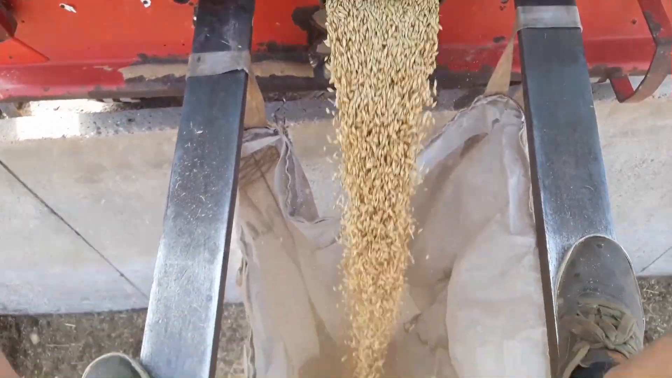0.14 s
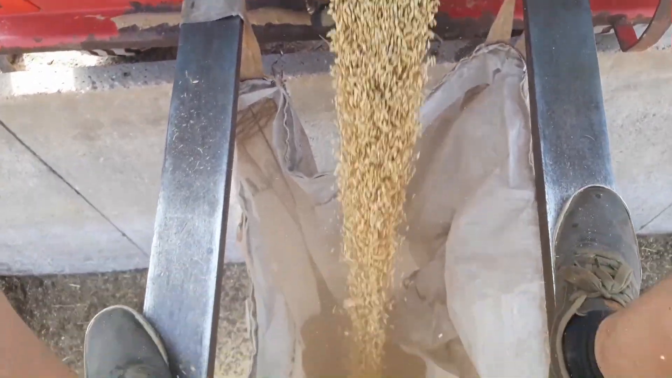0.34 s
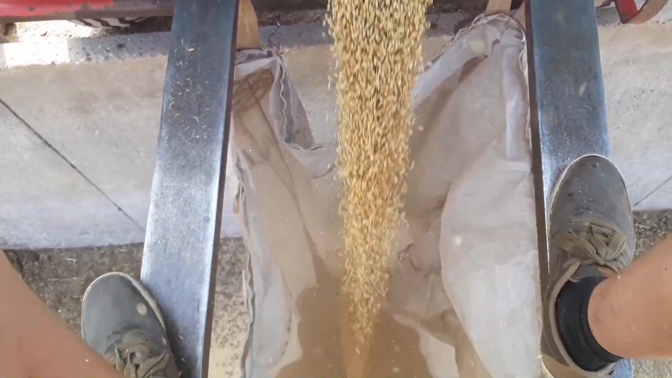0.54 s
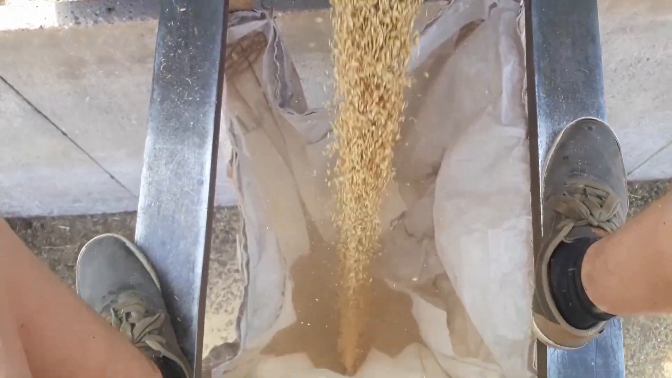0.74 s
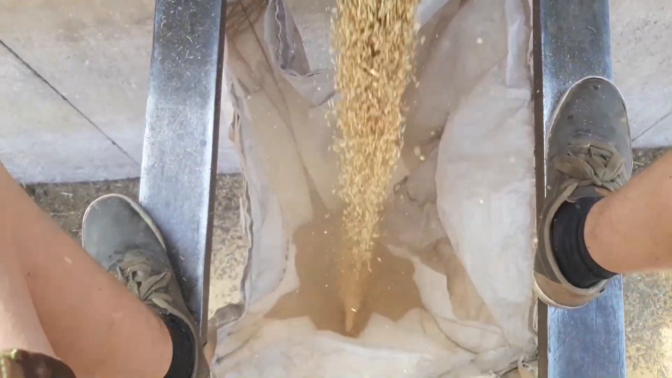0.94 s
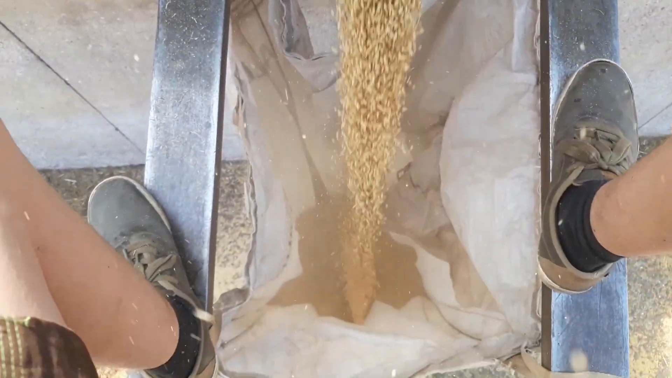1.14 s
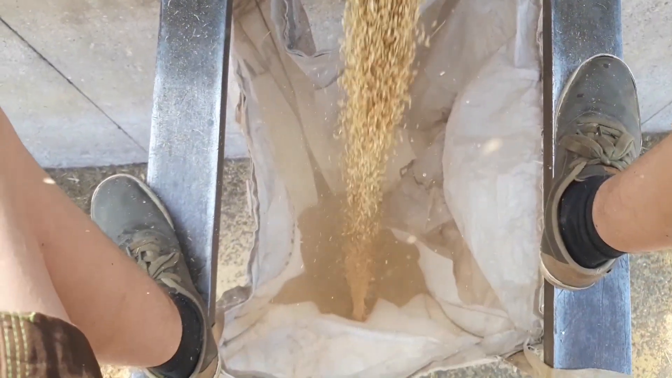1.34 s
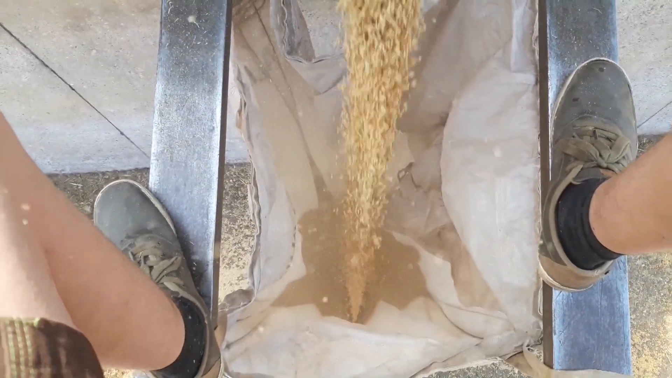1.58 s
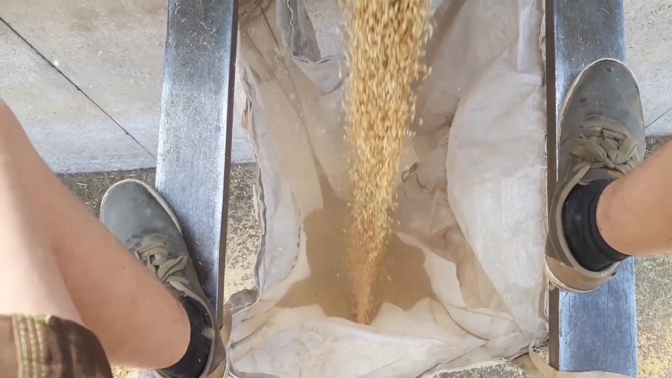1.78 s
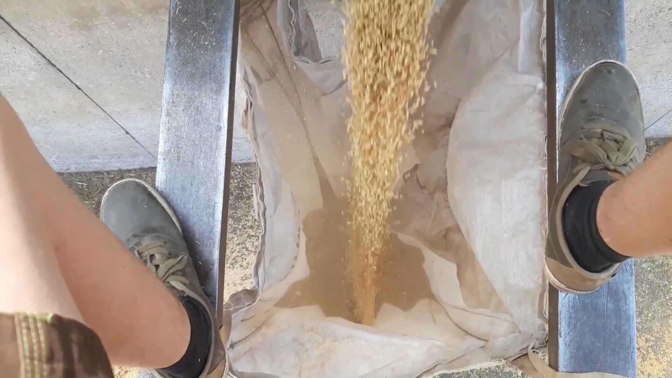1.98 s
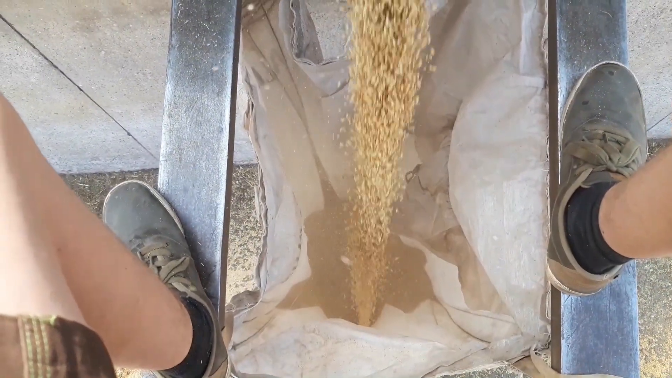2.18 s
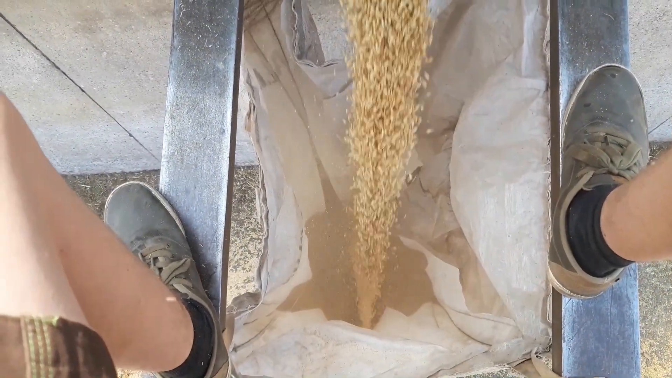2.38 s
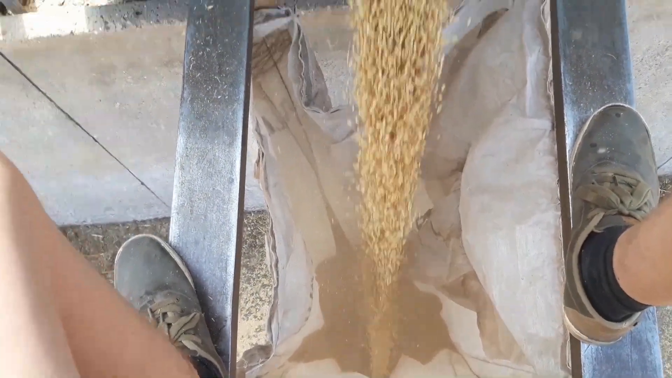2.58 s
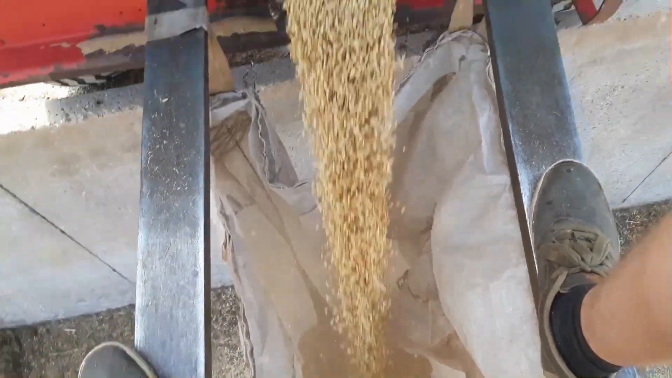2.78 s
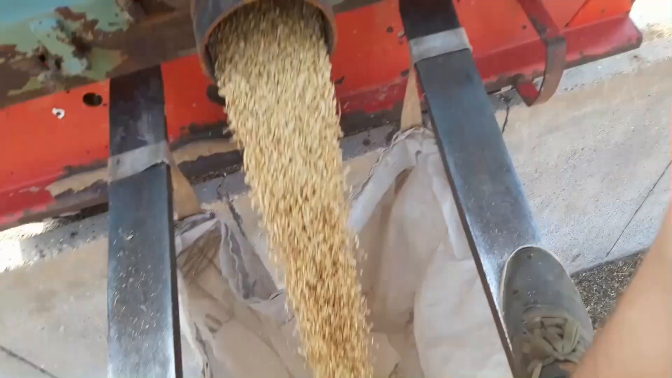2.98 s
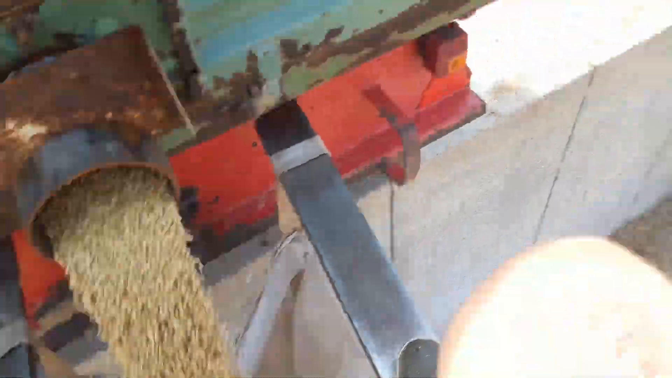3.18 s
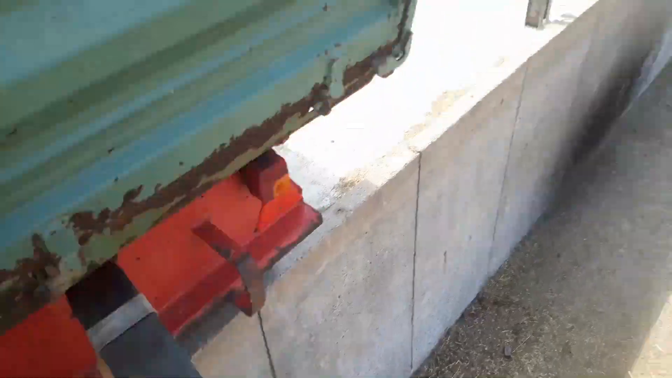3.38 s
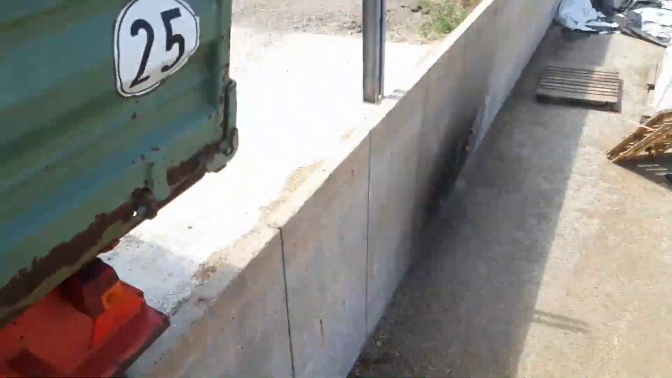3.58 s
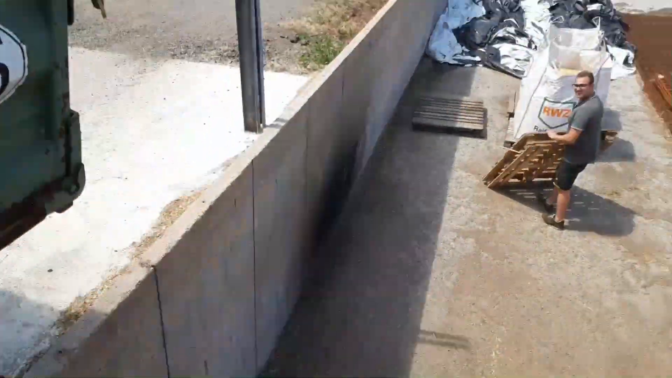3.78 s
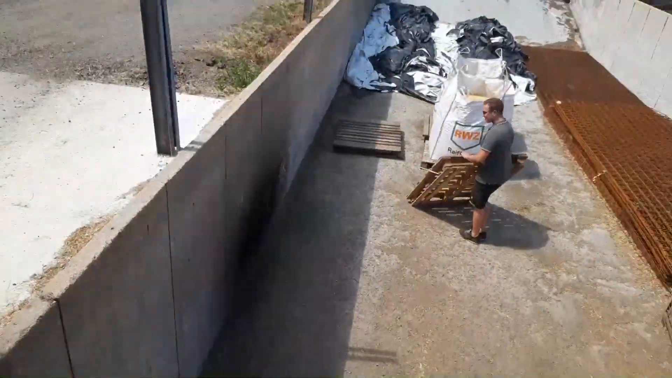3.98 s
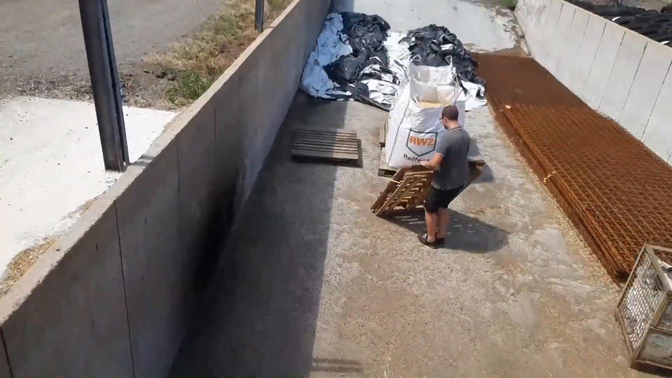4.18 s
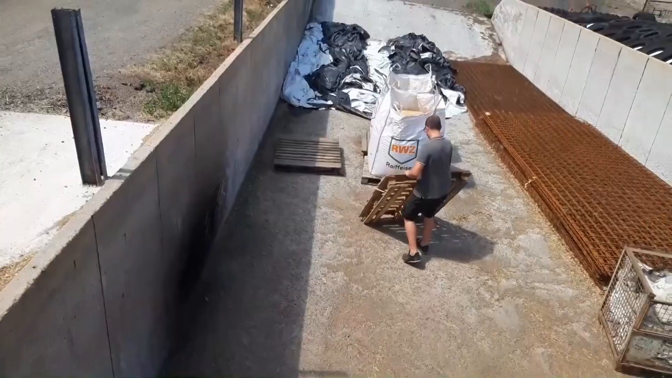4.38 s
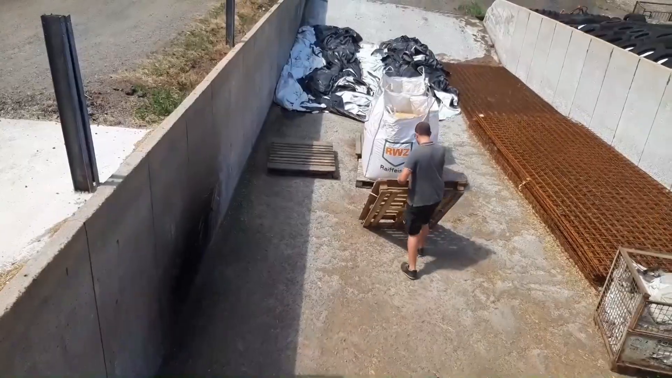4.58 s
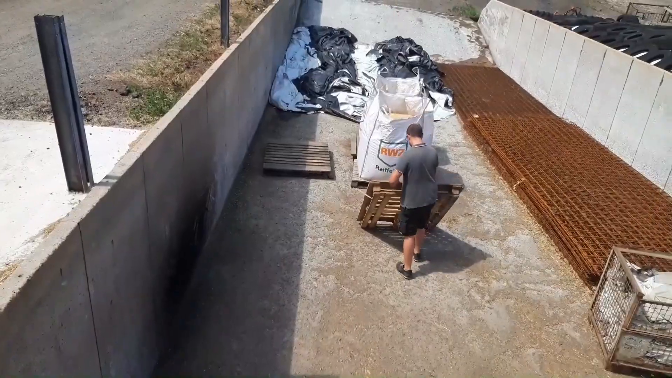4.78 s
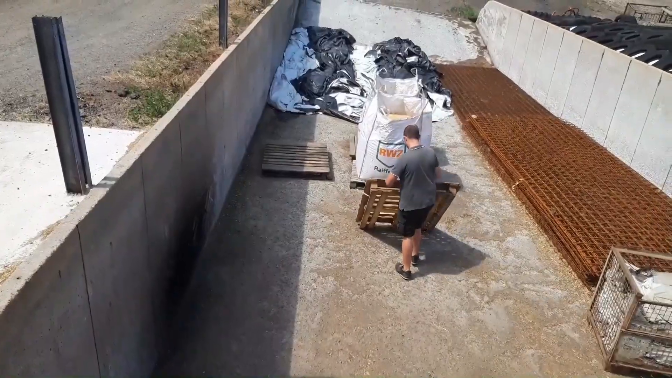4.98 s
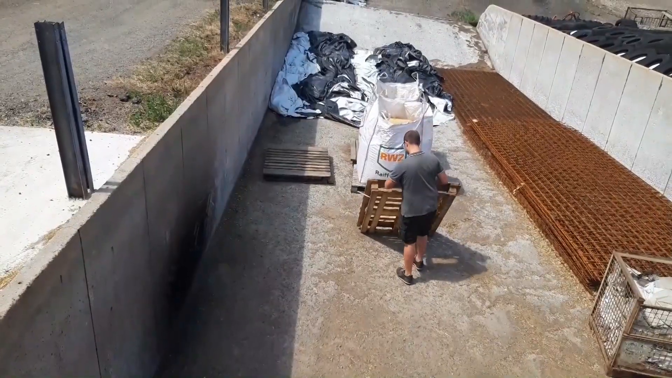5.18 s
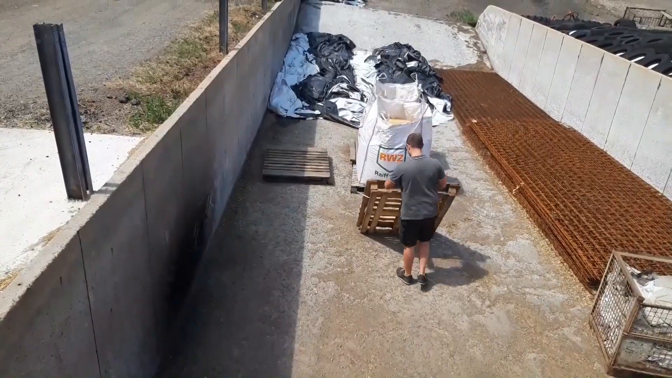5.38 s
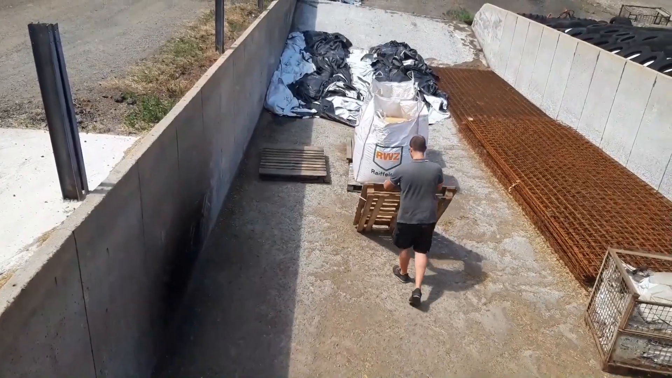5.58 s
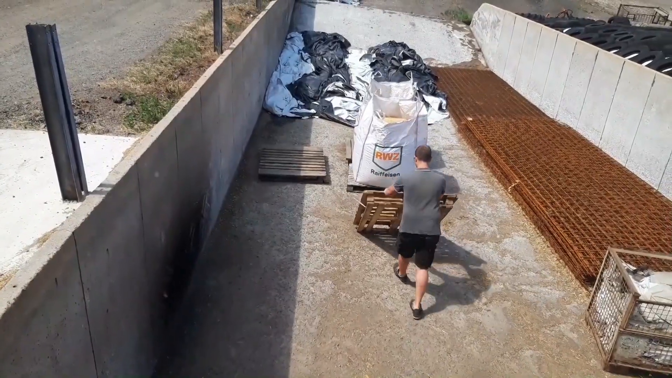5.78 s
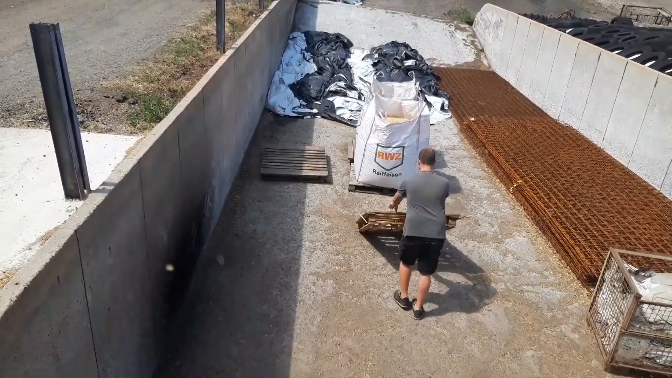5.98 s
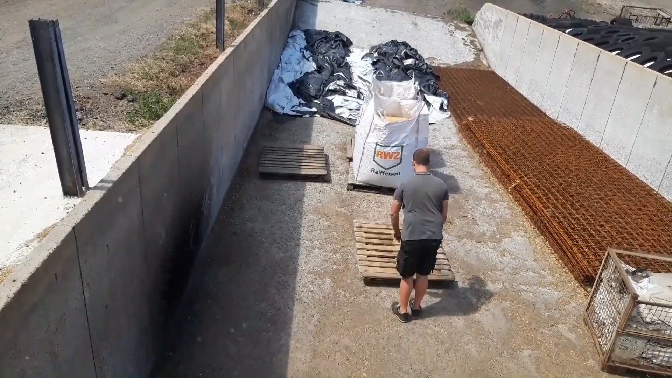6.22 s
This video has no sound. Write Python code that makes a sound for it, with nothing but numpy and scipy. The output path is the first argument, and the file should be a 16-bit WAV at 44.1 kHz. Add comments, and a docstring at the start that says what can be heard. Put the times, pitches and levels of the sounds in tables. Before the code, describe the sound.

Dry grain pours without pause from a trailer outlet into a large woven bag in a concrete farm yard. A bright grainy hiss sits over a faint low rumble. In the first half, kernels spatter in loud clumps, slap the cloth and thump it dully. Midway the hand-held mono microphone swings away; the hiss continues, the bag resonates less, and only soft spatter, small splashes and a few tiny ticks remain.

```python
"""Dry grain pours from a trailer outlet into a big woven bag, heard by a hand-held mono microphone.
From the start the falling stream hisses, made of countless tiny clicks, over a low rumble of noise.
Early on, clumps of clicks spatter loudly, noise puffs splash and slap, and damped sines thump the cloth.
A brief sine hum comes just after one second. Midway the microphone turns away and the bag rings less.
It then turns partly back, over softer spatter and small splashes; a few short sine ticks stand out."""
import sys
import numpy as np
from scipy import signal
from scipy.fft import rfft, irfft, next_fast_len
from scipy.io import wavfile
from scipy.ndimage import uniform_filter1d

SR = 44100
rng = np.random.default_rng(int(sys.argv[2]) if len(sys.argv) > 2 else 0)


def wav_out(sig):
    """Save sig, one row per channel (or a flat mono array), as 16-bit PCM at SR to the path in sys.argv[1]."""
    wavfile.write(sys.argv[1], SR, np.round(np.clip(np.atleast_2d(sig).T, -1, 1) * 32767).astype(np.int16))


def rack_gain(trim_db):
    """Turn a fader trim in dB into the linear factor to multiply a signal by."""
    fader = np.asarray(trim_db, float)
    return 10 ** (fader / 20)


N = 275620  # length in samples


def evened(x):
    """Scales to rms 1."""
    return x / np.sqrt(np.mean(x ** 2) + 1e-20)


def over_time(points):
    """Draws straight lines between points of (seconds, value), giving one value per sample."""
    return np.interp(np.arange(N) / SR, *np.transpose(points))


def read(points, hz):
    """Reads a spectrum on a log-frequency axis."""
    f, value = np.transpose(points)
    return np.interp(np.log(hz + 1), np.log(f + 1), value)


def wander(seconds):
    """Slow chance of rms 1: noise averaged twice over the given time."""
    width = max(round(seconds * SR), 2)
    smooth = uniform_filter1d(rng.standard_normal(N), width)
    return evened(uniform_filter1d(smooth, width))


def patches(hz, t, bins, frames):
    """Random patches of rms 1 over frequency and time."""
    raw = rng.standard_normal((len(t), len(hz))).T
    across_hz = uniform_filter1d(raw, bins, 0)
    return evened(uniform_filter1d(across_hz, frames, 1))


def coloured(x, field_db):
    """Multiplies the short-time spectrum by a dB field of frequency and time."""
    hz, t, z = signal.stft(x, SR, nperseg=512, noverlap=384)
    z = z * rack_gain(field_db(hz[:, None], t))
    return signal.istft(z, SR, nperseg=512, noverlap=384)[1][:N]


def through(x, colour_db):
    """Gives a sound a fixed colour."""
    size = next_fast_len(len(x))
    gain = rack_gain(colour_db(np.fft.rfftfreq(size, 1 / SR)))
    return irfft(rfft(x, size) * gain, size)[:len(x)]


def laid(times, level_db, sounds):
    """Places each sound at its time and level."""
    out = np.zeros(N + sounds.shape[1])
    for s, db, sound in zip(times, level_db, sounds):
        out[round(s * SR):][:len(sound)] += rack_gain(db) * sound
    return out[:N]


# Resonances of the bag's hollow and cloth, which each sound scales by its own depth.
# Each row: frequency in Hz, width in Hz, lift in dB at depth 1.
BAG_RESONANCES = [(339, 56, 7), (640, 125, 5.5), (813, 24, 8), (1000, 58, 2), (1585, 120, 5.5),
                  (1910, 54, 6), (3340, 180, 3.5), (4500, 110, 1), (4330, 89, 2.5), (4880, 310, 3.5),
                  (5940, 76, 5.5), (6880, 570, 2)]


def ring_db(hz):
    """The resonances of the bag as lifts of the spectrum, added together."""
    return sum(db / (1 + (2 * (hz - f) / width) ** 2) for f, width, db in BAG_RESONANCES)


# How far the microphone points into the bag.
# Each row: time in seconds, share from 0 to 1.
FACING_BAG = [(0, 0.53), (1.0, 1), (2.6, 0.9), (3.2, 0.65), (3.7, 0.3), (4.5, 0.6), (6.25, 0.55)]


def ringing(x, colour_db, depth):
    """Colours a sound; the bag resonances fade as the microphone turns away."""
    facing = np.clip(over_time(FACING_BAG), 0, 1)
    plain = through(x, colour_db)
    in_bag = through(plain, lambda hz: depth * ring_db(hz))
    return plain + facing * (in_bag - plain)


def kernels(per_s, spread_db):
    """Clicks of kernels at random moments, a few of them large."""
    excess_db = spread_db * np.minimum(rng.exponential(1, N), 5)
    size = rack_gain(excess_db) * rng.choice([-1., 1.], N)
    return evened(size * (rng.random(N) < per_s / SR))


def bursts(rows, octaves, t60):
    """Puffs of noise in a band: quick rise, hold, then a fall of 60 dB in t60 seconds."""
    s, level_db, centre_hz, hold = np.transpose(rows)
    size, rise_s = 8192, 0.0015
    hz, t = np.fft.rfftfreq(size, 1 / SR), np.arange(size) / SR
    distance = np.log2((hz + 1) / centre_hz[:, None])  # octaves from the centre
    band = np.exp(-.5 * (distance / octaves) ** 2)
    puff = irfft(rfft(rng.standard_normal((len(s), size))) * band, size)
    puff /= 3 * puff.std(1, keepdims=True)  # 0 dB is three times the noise's rms
    rise = 1 - np.exp(-t / rise_s)
    fall = rack_gain(-60 * np.maximum(t - hold[:, None], 0) / t60)
    struck = laid(s, level_db, puff * rise * fall)
    return through(struck, lambda hz: -10 * np.log10(1 + (hz / 7300) ** 12))  # no top treble


# Lumpy low wash of the heap settling.
# Each row: time in seconds, level in dB before the random lumps.
RUMBLE_LEVEL = [(0.0, -55), (0.9, -48.5), (1.58, -50.5), (2.61, -46.5), (3.25, -49), (3.95, -55.5),
                (4.58, -49), (5.0, -55), (5.7, -60), (6.25, -51)]


def rumble():
    """The heap settles: low noise rings the bag and swells in random lumps."""
    corner_hz, lumps_db = 300, 3.5
    low_db = lambda hz: -10 * np.log10(1 + (hz / corner_hz) ** 4)
    low = ringing(rng.standard_normal(N), low_db, depth=1.6)
    lumps = evened(low * rack_gain(lumps_db * wander(0.032)))
    return rack_gain(over_time(RUMBLE_LEVEL)) * lumps


def hum():
    """A brief low sine that swells in and out."""
    start_s, end_s, pitch_hz, level_db = 1.23, 1.36, 112, -46
    t = np.arange(N) / SR
    swell = np.clip(np.minimum(t - start_s, end_s - t) * 40, 0, 1)  # ramps of 1/40 s
    return rack_gain(level_db) * swell * np.sin(2 * np.pi * pitch_hz * t)


# Dull thumps of the bag.
# Each row: start in seconds, peak in dB, hardness in dB per octave.
THUMPS = [(0.335, -28, 7), (0.555, -26, 8), (0.772, -28.5, 14), (1.594, -27.5, 1), (1.651, -33, 6),
          (1.778, -32, 5), (2.005, -30, -1), (2.38, -38, 6), (2.508, -34, 14), (2.661, -46, -7),
          (2.769, -35, -5), (2.901, -35, 14), (2.999, -32, -11), (3.2, -42, -6), (3.635, -31, -2),
          (3.749, -37, -9), (4.249, -41, -12), (4.77, -32.5, 1), (6.036, -37, 1), (6.099, -32.5, 12)]
# Ways in which the loaded cloth vibrates.
# Each row: frequency in Hz before a random shift, level in dB before hardness, time to fall 60 dB in seconds.
CLOTH_MODES = [(81, -12, 0.078), (132, 1, 0.093), (241, 2.5, 0.063), (334, -3, 0.099)]


def thumps():
    """The loaded cloth is knocked: heavily damped modes, harder knocks favour the high ones."""
    s, peak_db, hard_db = np.transpose(THUMPS)
    t = np.arange(8192) / SR
    slack = 0.12  # each thump shifts each mode by about this share at most
    shift = 1 + slack * rng.uniform(-1.1, 1, (len(s), len(CLOTH_MODES)))
    wave = 0
    for k, (hz, db, t60) in enumerate(CLOTH_MODES):
        tone = (-1) ** k * np.sin(2 * np.pi * hz * shift[:, k, None] * t)
        mode_db = db + hard_db[:, None] * np.log2(hz / 128) - 60 * t / t60
        wave = wave + tone * rack_gain(mode_db)
    wave *= 1 - np.exp(-(t / 0.0052) ** 2)  # soft onset, in seconds
    return laid(s, peak_db, wave / abs(wave).max(1, keepdims=True))


# Short pitched ticks.
# Each row: start in seconds, peak in dB, pitch in Hz.
TICKS = [(3.206, -16, 1600), (3.221, -19, 2300), (3.384, -20, 1760), (4.6, -14.5, 5200), (4.6, -23, 4540)]


def ticks():
    """Something small and hard rings for an instant: sines that die away quickly."""
    s, peak_db, hz = np.transpose(TICKS)
    t = np.arange(4096) / SR
    rise_s, t60_s = 0.0015, 0.028
    envelope = (1 - np.exp(-t / rise_s)) * rack_gain(-60 * t / t60_s)
    ring = np.sin(2 * np.pi * hz[:, None] * t) * envelope
    return laid(s, peak_db, ring / abs(ring).max(1, keepdims=True))


# Loudness of the falling stream.
# Each row: time in seconds, level in dB before a slight flutter.
STREAM_LEVEL = [(0.0, -24), (0.35, -26.5), (0.55, -21), (0.76, -22), (0.9, -23.5), (1.15, -24.5),
                (1.67, -27), (2.37, -26), (2.78, -28.5), (3.06, -24), (3.39, -28), (3.67, -24.5),
                (4.3, -27.5), (5.17, -25.5), (6.25, -27)]
# Colour of the stream before the treble dip and the bag's ringing.
# Each row: frequency in Hz, relative level in dB.
STREAM_COLOUR = [(40, -37), (200, -15), (400, -11), (670, -15.5), (1490, -10), (1730, -16.5), (3200, -2.5),
                 (4680, -12.5), (5400, -4), (6500, -5), (8200, -9), (10300, -15), (12500, -9),
                 (14000, -10.5), (15700, -5.5)]


def stream():
    """Countless kernels rubbing as they fall: smooth hiss with faint patches and flutter."""
    dip_hz, dip_width_hz, dip_db = 9970, 900, 4.5  # a dip in the treble; width is to half depth

    def drift_db(hz, t):
        dip = dip_db / (1 + ((hz - dip_hz) / dip_width_hz) ** 2)
        return 1.17 * patches(hz, t, bins=8, frames=12) - dip
    rubbing = coloured(kernels(per_s=20000, spread_db=1.5), drift_db)
    hiss = evened(ringing(rubbing, lambda hz: read(STREAM_COLOUR, hz), depth=0.42))
    flutter_db = 0.65 * wander(0.018)
    return hiss * rack_gain(over_time(STREAM_LEVEL) + flutter_db)


# Heavier slaps of grain on the bag wall.
# Each row: start in seconds, level in dB, centre in Hz, hold in seconds.
SLAPS = [(0.772, -10.5, 1910, .012), (1.17, -22.5, 1100, 0.067), (1.82, -24.5, 900, 0.011),
         (2.012, -7, 2460, .012), (3.005, -26.5, 720, 0.088), (3.205, -18, 1300, 0.022),
         (3.381, -17.5, 1000, .02)]


def slaps():
    """Grain slaps the bag wall: noise puffs, wider and longer than the splashes."""
    return bursts(SLAPS, octaves=0.99, t60=0.1)


# Sudden flurries of kernels.
# Each row: start in seconds, level in dB, centre in Hz, hold in seconds.
SPLASHES = [(.375, -12, 3200, .008), (0.525, -6.5, 3320, 0.013), (0.565, -1, 5000, 0.0036),
            (.593, -7, 3280, 0.0073), (1.165, -12, 3830, .015), (1.2, -1.5, 3900, .012),
            (1.503, -11, 3330, .012), (1.551, -7, 3400, 0.0094), (1.709, -10, 6950, .003),
            (2.072, -4, 3300, .012), (2.818, -11, 3840, .003), (2.89, -11.5, 3080, .03),
            (3.029, -9.5, 3340, 0.025), (3.124, -12, 4070, 0.042), (3.222, -10.5, 3630, .03),
            (3.405, -8, 3300, .003), (3.45, -15, 6700, .025), (3.603, -17, 3800, 0.0067),
            (3.899, -16, 3380, .008), (4.447, -15, 3430, .006), (4.484, -14, 3180, 0.009),
            (4.5, -12.5, 3900, .006), (4.583, -15, 3900, 0.0088), (4.646, -14, 3000, .006),
            (4.726, -14, 2900, .008), (5.015, -16, 3600, .006), (5.42, -19, 3400, 0.013),
            (5.496, -16, 3800, .006), (5.77, -15, 3100, .008), (5.945, -18.5, 3170, .012),
            (6.04, -20, 3360, 0.017), (6.13, -20, 2620, .008), (6.205, -17, 3100, .008)]


def splashes():
    """A handful of kernels strikes at once: short puffs of noise."""
    return bursts(SPLASHES, octaves=0.43, t60=0.037)


# Loudness of the kernels landing in the bag.
# Each row: time in seconds, level in dB before the random clumps.
SPATTER_LEVEL = [(0, -21), (0.13, -14), (0.22, -20), (0.4, -20.5), (0.54, -17.5), (0.69, -18.5),
                 (0.78, -16), (0.84, -18.5), (1.12, -21), (1.18, -13), (1.24, -13.5), (1.3, -19),
                 (1.4, -19.5), (1.47, -24.5), (1.66, -24), (1.77, -20), (1.83, -23.5), (1.95, -18),
                 (2.03, -14.5), (2.06, -17.5), (2.09, -14), (2.27, -16.5), (2.31, -13.5), (2.42, -22.5),
                 (2.47, -17), (2.52, -20), (2.58, -16), (2.7, -23), (2.98, -21.5), (3.14, -19), (3.24, -20),
                 (3.33, -25), (3.5, -26.5), (3.58, -21), (3.74, -29.5), (4.08, -33), (4.15, -25.5),
                 (4.25, -32), (4.95, -30), (5.05, -27.5), (5.26, -31), (5.45, -29.5), (5.9, -33),
                 (6.15, -29.5), (6.25, -31)]
# Colour of the landing before the changing tone and the bag's ringing.
# Each row: frequency in Hz, relative level in dB.
SPATTER_COLOUR = [(180, -53), (300, -27.5), (546, -21.5), (798, -12.5), (1080, -11.5), (1550, -11.5),
                  (2090, -6), (2330, -3.5), (3920, 0.5), (5380, -8), (7030, -10.5), (9940, -32),
                  (13000, -26.5)]
# Tone of the landing as the microphone swings.
# Each row: time in seconds, brightness in dB per octave, heaviness in dB of the low body before it wanders.
SPATTER_TONE = [(0, 1, -1), (0.5, 6, 1.5), (1.05, 2.5, -6), (1.3, 1, -1.5), (1.55, 4.5, -2),
                (1.9, 0.9, -1.5), (2.3, 0.8, 0), (2.75, -2, -8.5), (3.0, 0, -3.5), (3.25, -0.3, -1.8),
                (3.35, 5, 2), (3.7, 4.5, 5.5), (3.9, -2, -1.5), (4.6, -2.5, 6), (5.1, -5.5, -0.7),
                (6.25, 0.5, 4.5)]


def spatter():
    """Kernels land in clumps and ring the bag; the colour follows brightness and heaviness."""
    s, bright_db, heavy_db = np.transpose(SPATTER_TONE)

    def drift_db(hz, t):
        octaves = np.log2(np.clip(hz, 2500, 14000) / 3500)
        tilt = np.interp(t, s, bright_db) * octaves
        wander_db = 1.74 * np.interp(t, np.arange(N) / SR, wander(0.061))
        body = (np.interp(t, s, heavy_db) + wander_db) / (1 + (hz / 1800) ** 4)
        return tilt + body + 0.81 * patches(hz, t, bins=9, frames=6)
    landing = coloured(kernels(per_s=9000, spread_db=3.0), drift_db)
    patter = evened(ringing(landing, lambda hz: read(SPATTER_COLOUR, hz), depth=0.99))
    clumps_db = 0.82 * wander(0.0035) + 0.79 * wander(0.019)
    return patter * rack_gain(over_time(SPATTER_LEVEL) + clumps_db)


def scene():
    """All sources, alike in both channels."""
    background = rumble() + hum() + thumps() + ticks()
    grain = stream() + slaps() + splashes() + spatter()
    return np.tile(background + grain, (2, 1))


def band_limit(x):
    """A steep low-pass at the top of the band."""
    return signal.sosfilt(signal.butter(12, 17080, fs=SR, output="sos"), x)


def record(dry):
    """A mono microphone rounds off its peaks, then cuts the deep bass and the very top."""
    low_hz, edge_hz = 65, 15740

    def band_db(hz):
        bass_cut = -10 * np.log10(1 + (low_hz / (hz + 1)) ** 6)
        return bass_cut - 120 * (hz > edge_hz)
    rounded = np.tanh(dry[0] / 1.1) * 1.1
    mono = through(rounded, band_db)
    return band_limit(np.tile(mono, (2, 1)))


dry = scene()
out = record(dry)
wav_out(out)
```